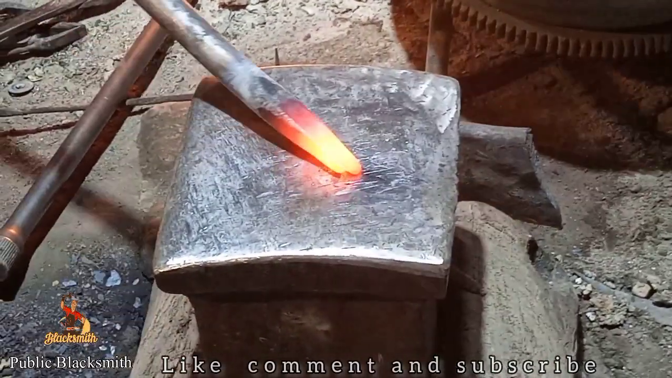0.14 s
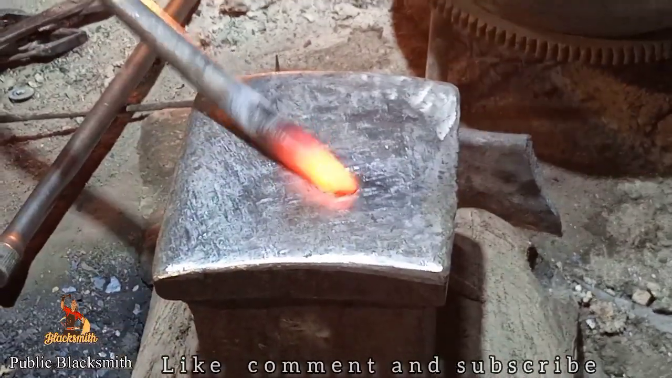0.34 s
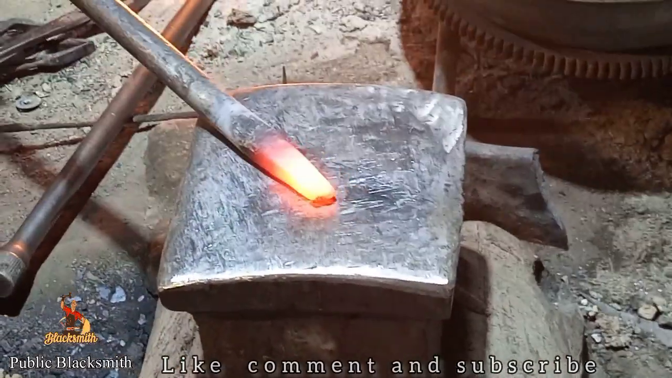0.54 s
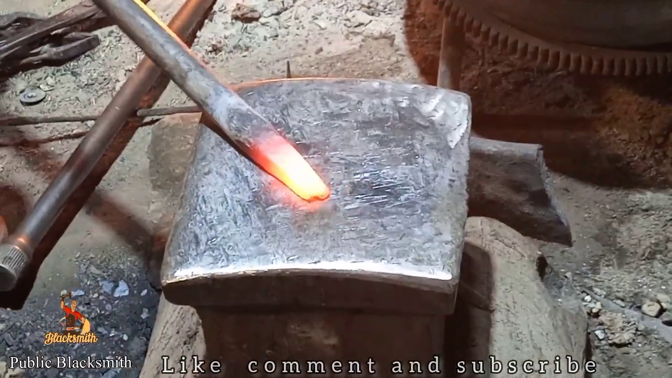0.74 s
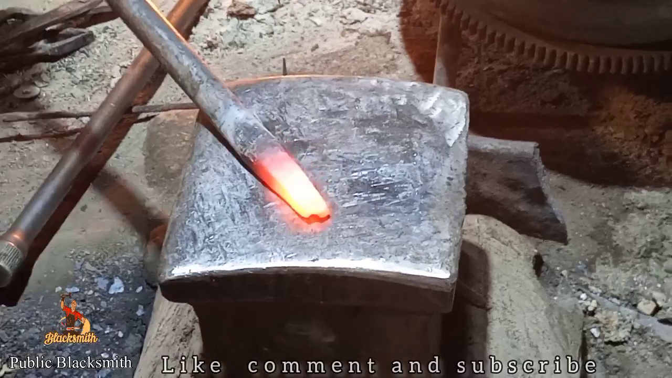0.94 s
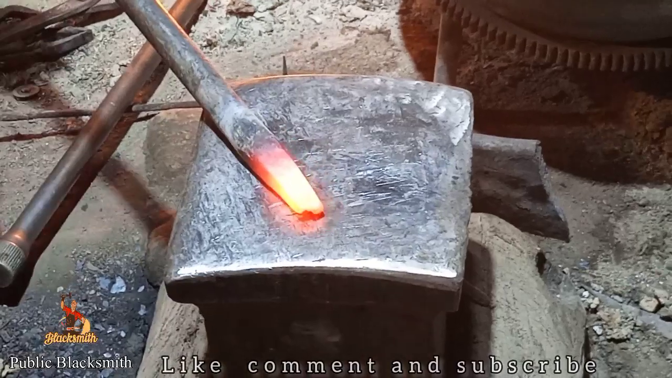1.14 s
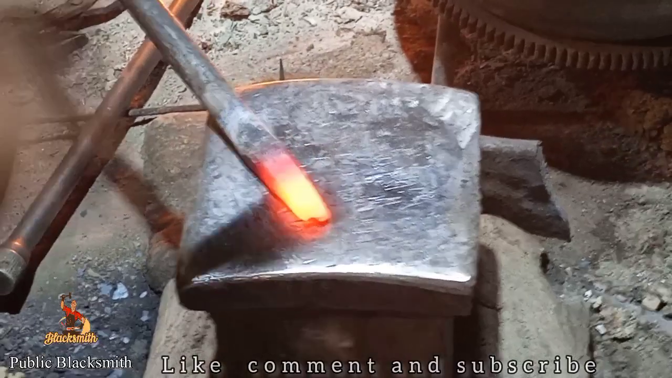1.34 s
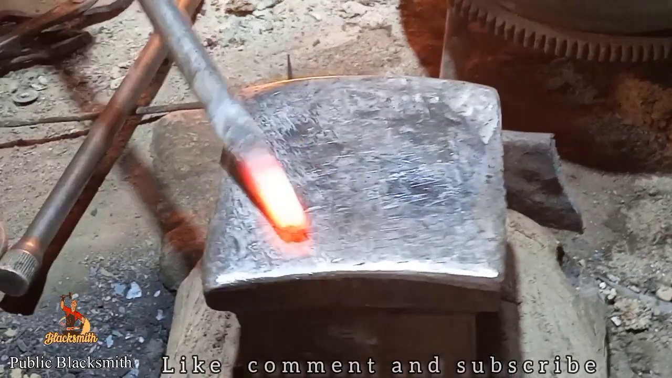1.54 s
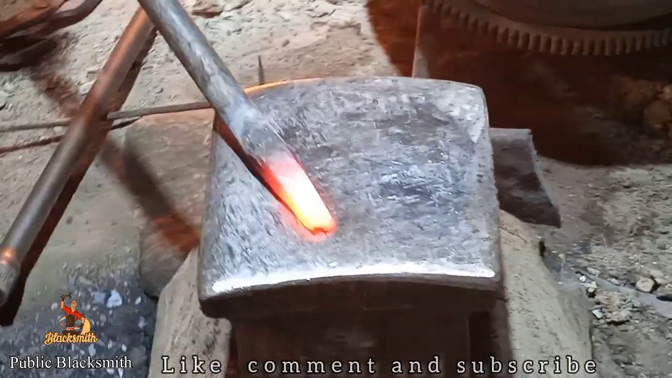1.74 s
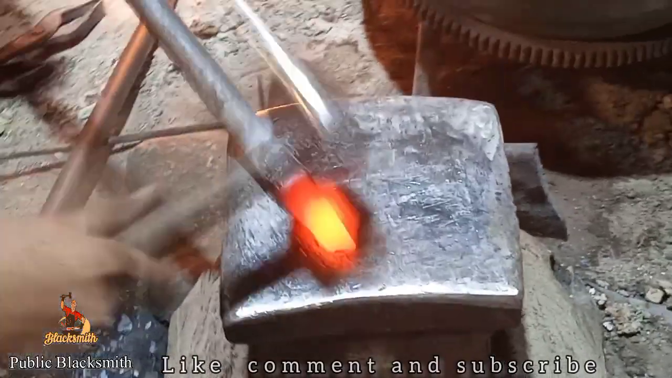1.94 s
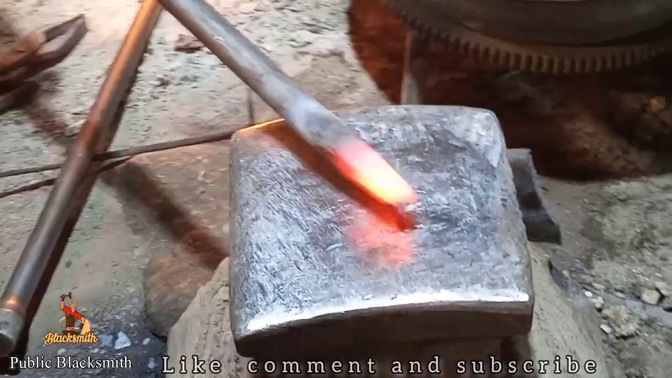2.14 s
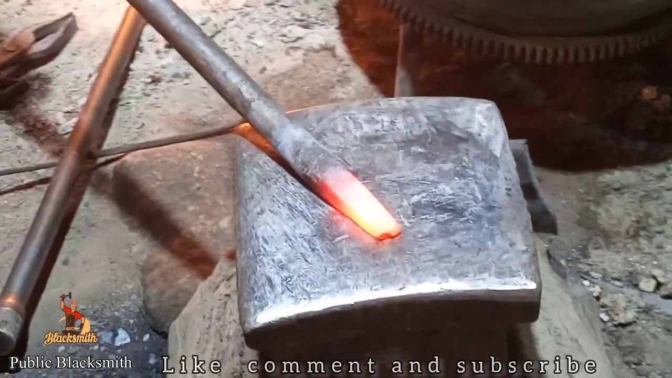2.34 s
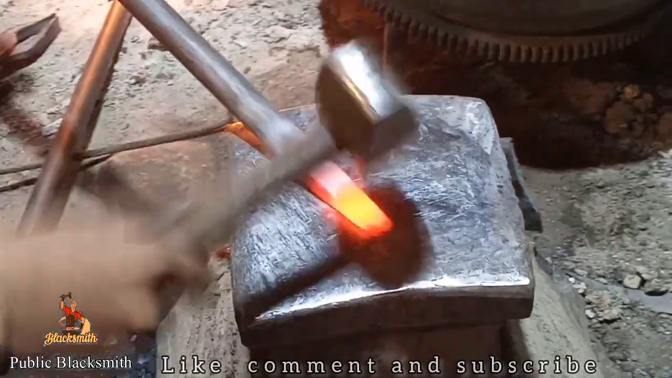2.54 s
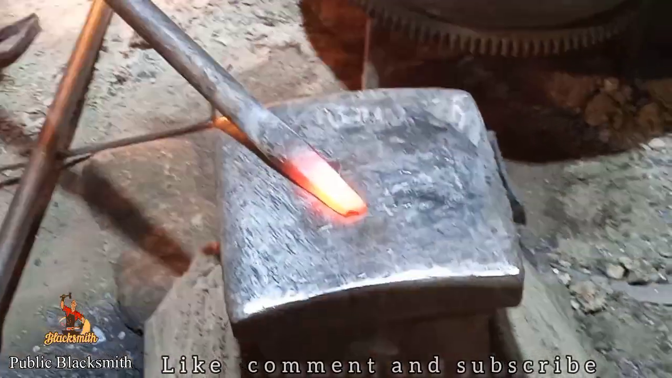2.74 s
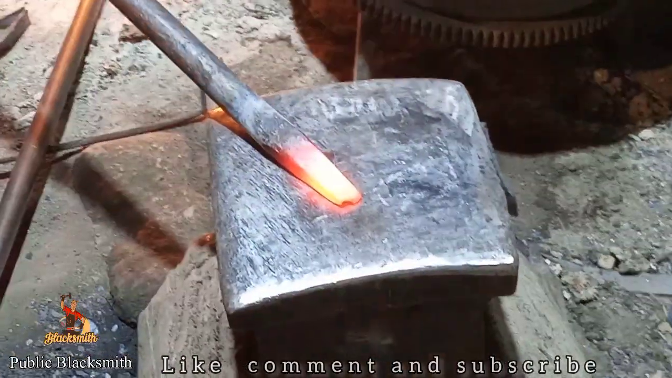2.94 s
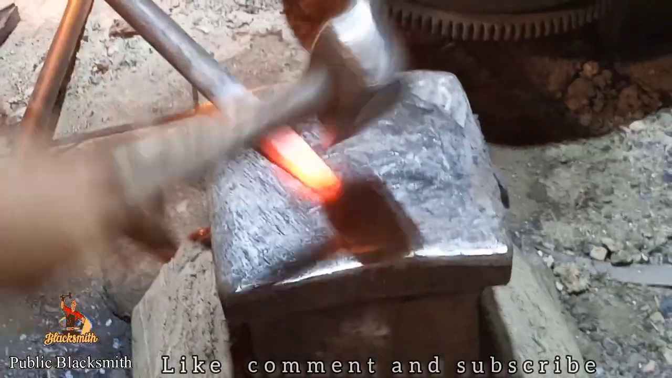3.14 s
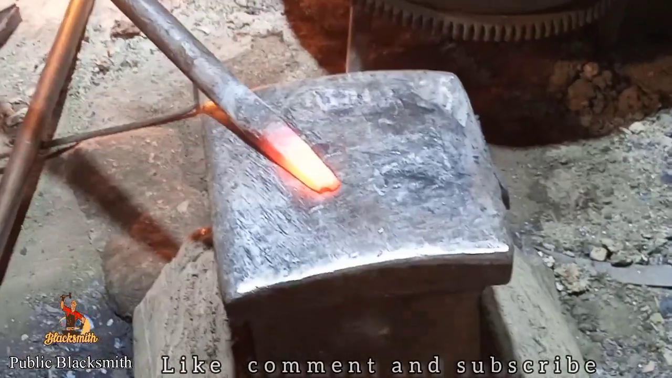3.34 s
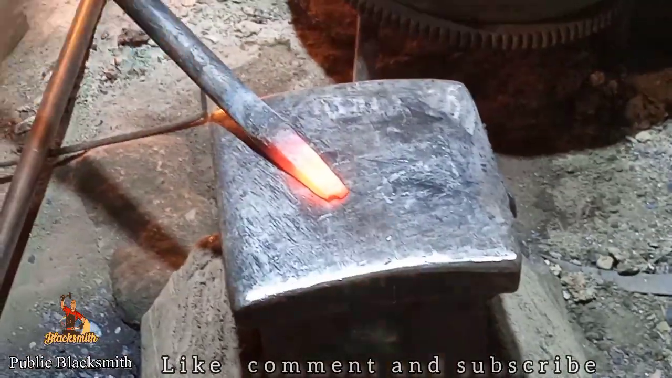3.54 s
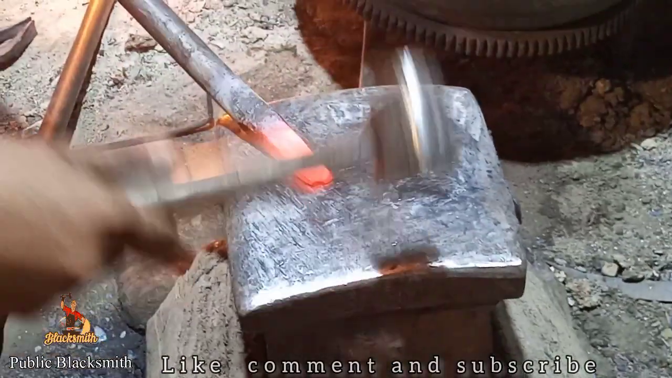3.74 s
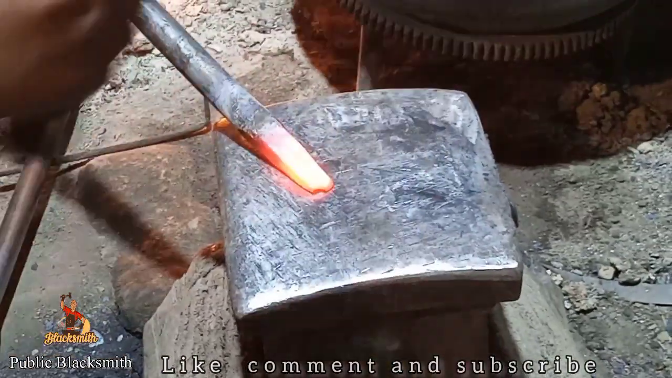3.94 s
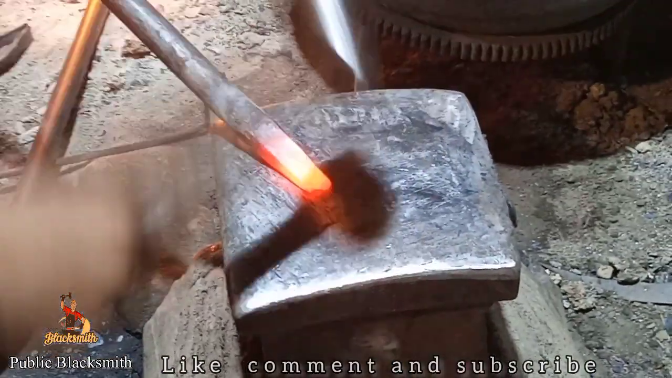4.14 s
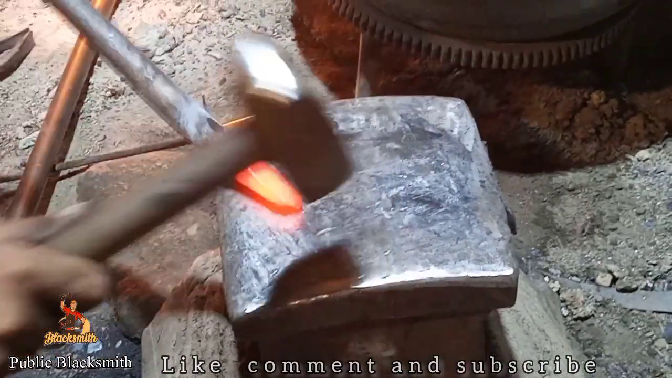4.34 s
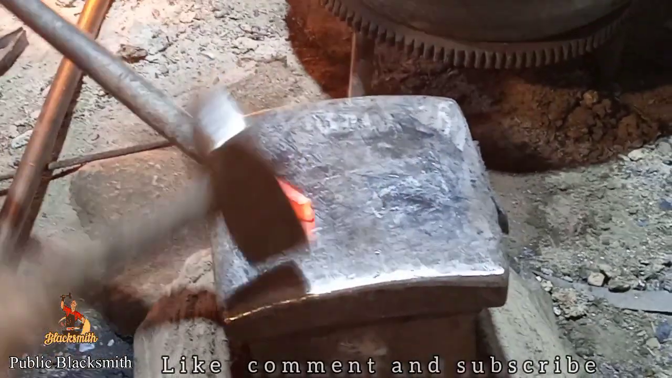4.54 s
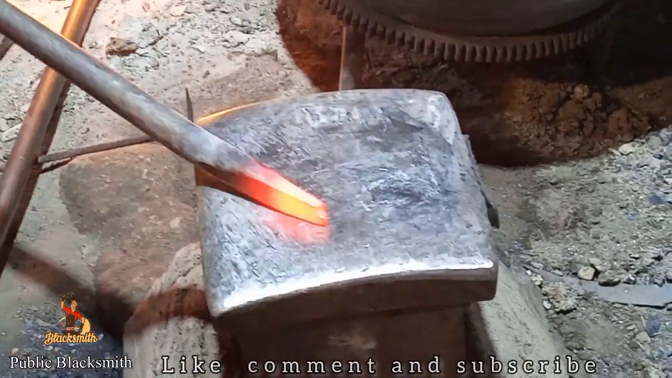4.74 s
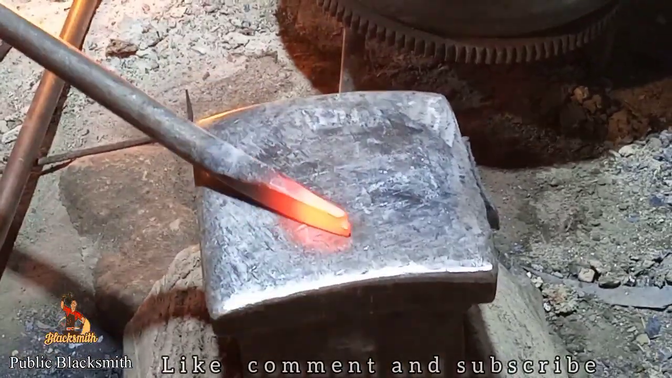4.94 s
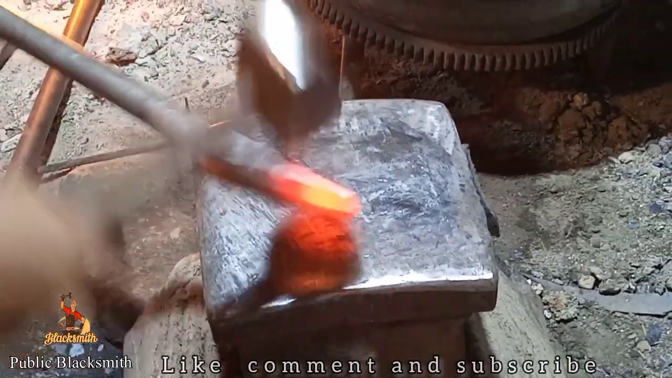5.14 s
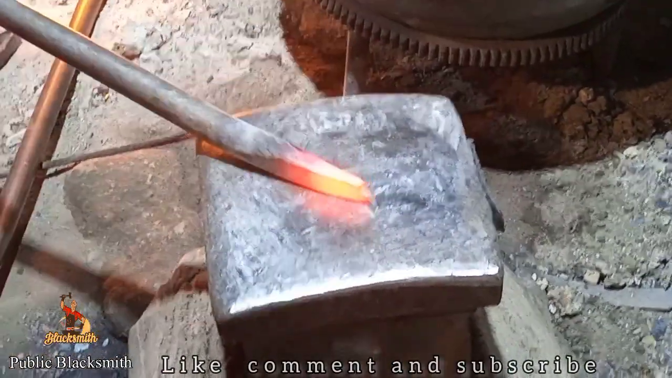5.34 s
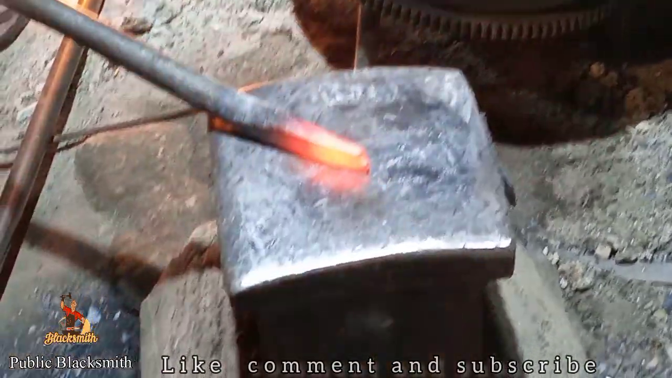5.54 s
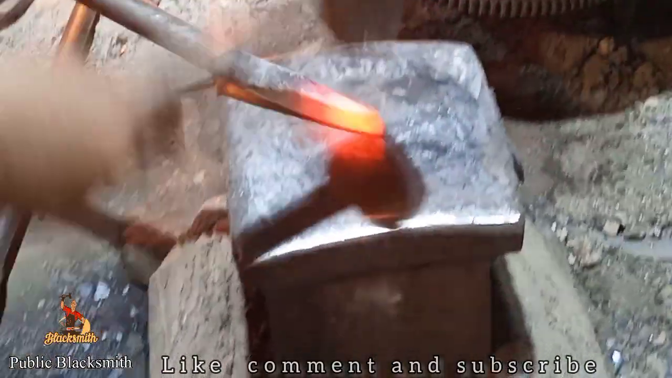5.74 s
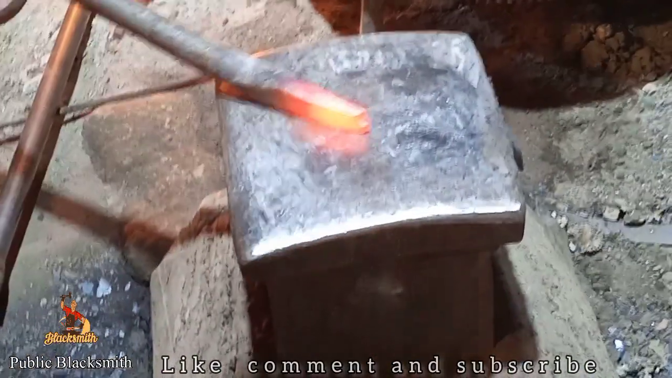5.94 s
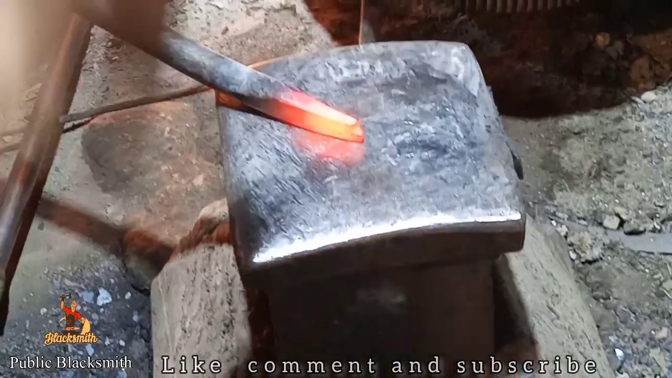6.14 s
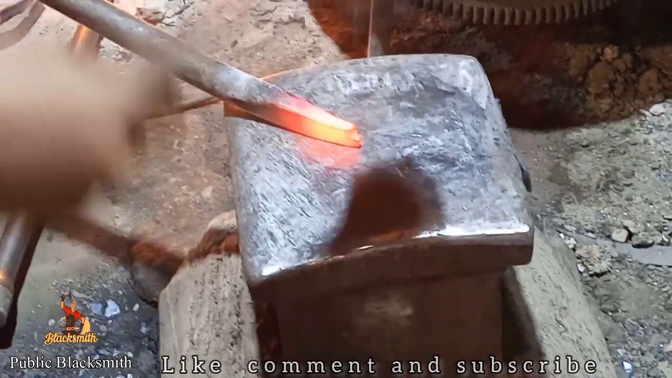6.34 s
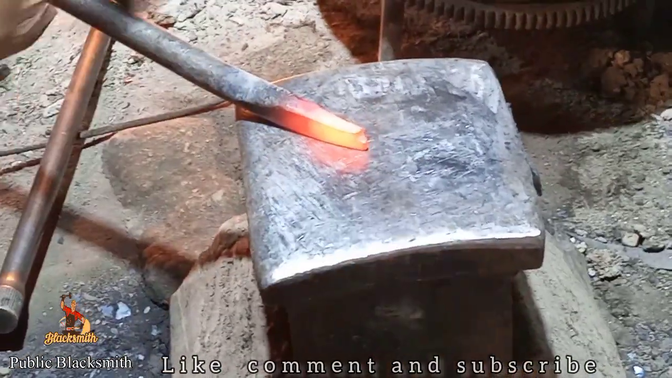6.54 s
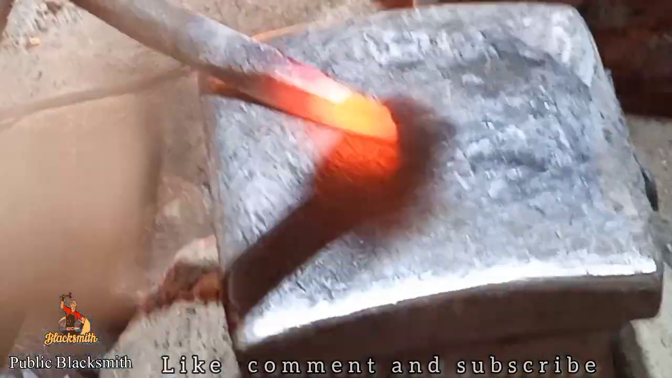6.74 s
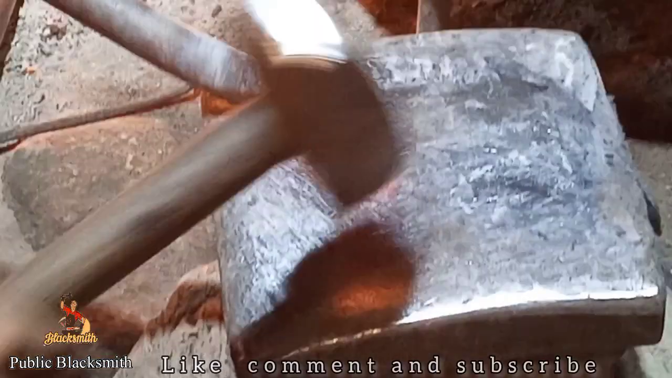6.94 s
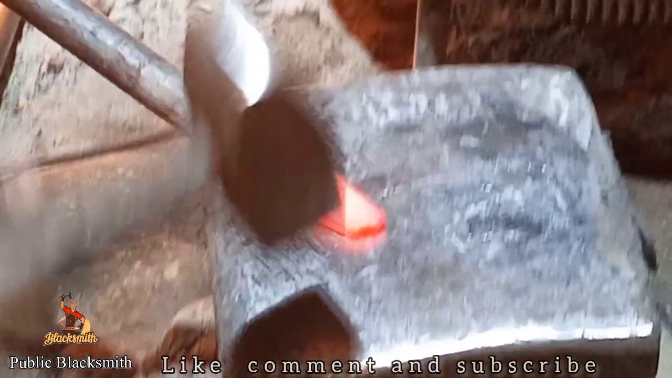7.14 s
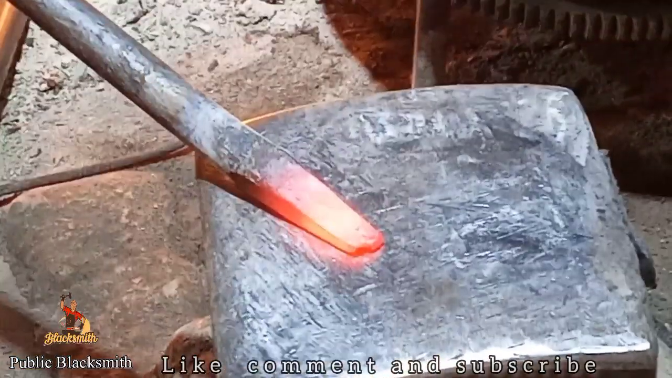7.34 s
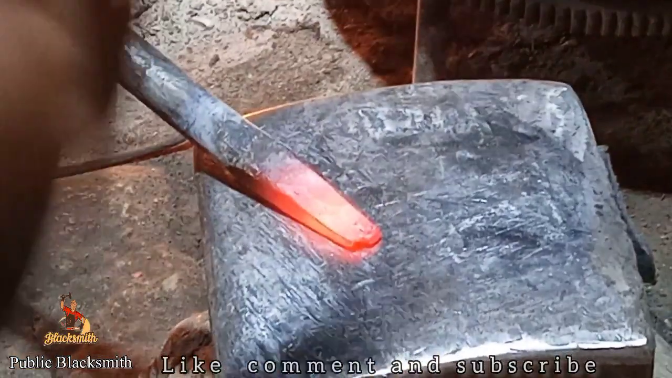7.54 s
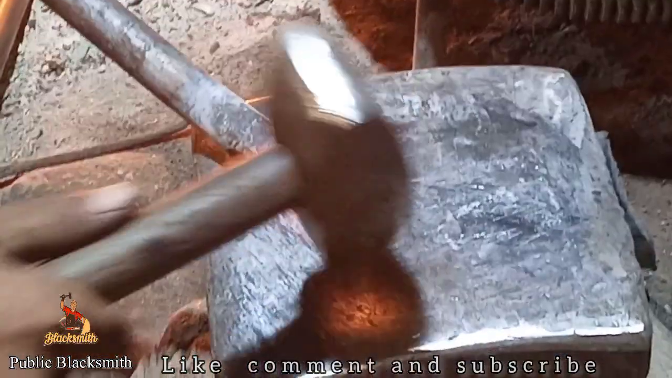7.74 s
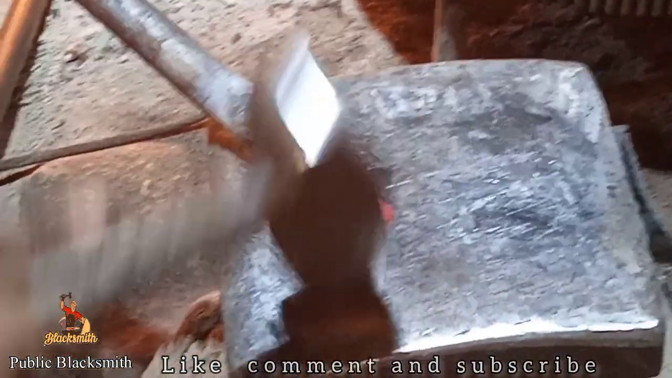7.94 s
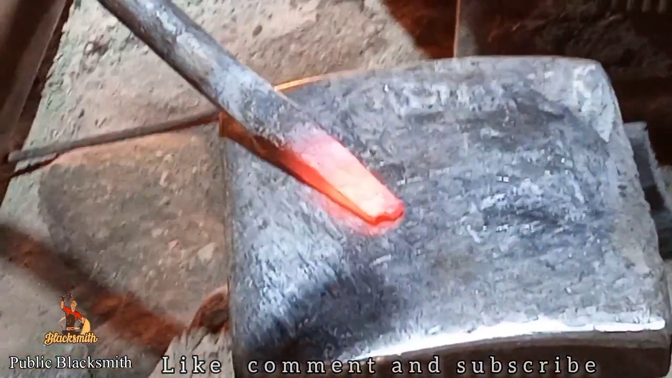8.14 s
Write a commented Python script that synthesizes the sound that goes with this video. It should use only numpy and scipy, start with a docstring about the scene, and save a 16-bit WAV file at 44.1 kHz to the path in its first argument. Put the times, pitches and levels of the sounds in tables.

```python
"""Hammer and anvil in an open forge

A hand hammer works a hot steel bar. Each blow is a burst of noise plus dying tones of bar, anvil
and hammer head; the bar hops and lands again with smaller knocks. Some taps hit the bare anvil.
The shed answers with fading noise echoes. Behind it a blower hisses and hums, made of shaped noise.
Soft low tones thud, some somewhere off, two as the deep thump of the first blow and its landing.
A phone's limiter squeezes every blow into a plateau."""
import sys
import numpy as np
from scipy import signal
from scipy.fft import rfft, irfft
from scipy.io import wavfile

SR = 44100
rng = np.random.default_rng(int(sys.argv[2]) if len(sys.argv) > 2 else 0)


def persist_wave(psi):
    """Save psi, clipped to +-1, as 16-bit WAV."""
    counts = np.round(np.clip(psi, -1, 1) * 32767).astype(np.int16)
    wavfile.write(sys.argv[1], SR, np.atleast_2d(counts).T)


def linear_from_db(decibels):
    """Turn decibels (scalar or array-like) into linear amplitude factors; 0 gives 1."""
    return 10 ** (np.asarray(decibels, float) / 20)


N = 361179      # length in samples

# Levels are those ahead of the limiter. Ring times are for a fall of 60 dB, before each strike's share.
# Hammer blows. Each row: start in seconds, crack level in dB, ring level of the bar flatwise in dB,
# and edgewise in dB, ring level of the hammer in dB, seconds until the bar rests.
BLOWS = [(1.4505, -0.5, -4, -33, -26, 0.81), (2.0228, 0.5, -3, -28, -49, 0.29),
         (2.596, -8, -13, -26, -39.5, 0.13), (3.161, -4, -16, -8, -38, 0.21),
         (3.729, -11, -33, -37, -36.5, 0.083), (4.2562, -2.5, -22, -1.5, -63, 0.3),
         (5.1947, 3.5, -11, 10.5, -21.5, .24), (5.754, -8, -17, -7.5, -34.5, 0.35),
         (6.322, -12, -12, -11.5, -30.5, 0.1), (6.8762, -3, -14.5, 0, -50, 0.3),
         (7.7235, -13.5, -12, -8, -35, 0.088)]
# The bar lands on the anvil. Each row: start in seconds, knock level in dB, ring level in dB,
# strongest pitch in Hz, fall away from that pitch in dB per octave.
LANDINGS = [(.490, -73, -45, 1900, 13), (.516, -65, -32.5, 3000, 44), (1.466, 1.5, -24, 2100, -9),
            (1.588, -18.5, -21, 2050, 14), (1.671, -26, -24.5, 1650, 10.5), (1.756, -53, -46.5, 2470, 0),
            (2.037, -7, 1.5, 2100, 0), (2.177, -10, -14, 1430, 10), (2.299, -25.5, -31, 4670, 1),
            (2.366, -40, -35, 4270, 13), (2.426, -39.5, -40.5, 2150, 5), (2.954, -71, -45.5, 1500, 46),
            (3.774, -21, -26, 2100, 8), (4.381, -17.5, -17.5, 2760, 5.5), (4.435, -31, -26.5, 2130, 1.5),
            (4.489, -27, -24, 3520, 10), (4.562, -37, -28, 2820, 15), (5.225, -11, 7.5, 2970, 20),
            (5.882, -26, -28, 3920, 5.5), (6.904, -44, -6, 2900, 14.5), (7.225, -54, -35, 2320, 10.5),
            (7.265, -61, -36.5, 4000, 11.5)]
# Bending tones of the bar lying flat: pitches in Hz; then each row: level in dB, ring time in seconds.
BAR_HZ = [877, 1425, 2064, 2810, 3600, 4483, 5490, 6570, 7770, 9000, 10370, 11710]
BAR_LEVELS = [(-7.5, 0.5), (-5, 0.51), (14, 0.11), (-1, 0.32), (-2.5, 0.32), (-5, 0.21), (-7, 0.31),
              (-7, 0.2), (-25.5, 0.44), (-29, 0.21), (-30, 0.4), (-54, 0.27)]
# Bending tones across its other side: pitches in Hz; then each row: level in dB, ring time in seconds.
EDGE_HZ = [1437, 2124, 2895, 3762, 4768, 5803, 6977, 8177, 9475]
EDGE_LEVELS = [(-4.5, 0.14), (-1, 0.4), (-1, 0.36), (-14, 0.53), (-16, 0.43), (-26, 0.46), (-23, 0.21),
               (-40, 0.4), (-37, 0.23)]
# Tones of the anvil: pitches in Hz; then each row: level in dB, ring time in seconds.
ANVIL_HZ = [1937, 3205, 3917, 5873, 6368, 9245, 10650]
ANVIL_LEVELS = [(7, .25), (-7.5, 0.53), (-13.5, 0.36), (-4, 0.3), (-33, 0.15), (-22.5, 0.34), (-32, 0.091)]
# Tones of the hammer head: pitches in Hz; then each row: level in dB, ring time in seconds.
HAMMER_HZ = [11236, 13150, 14600]
HAMMER_LEVELS = [(-10, 1), (-22, 0.5), (0, .1)]
# Crowded upper tones of the steel. Each row: pitch in Hz, level in dB, ring time in seconds.
UPPER = [(6900, 13, .19), (6800, -11, 0.27), (7050, 6, .2), (8210, -10, .3), (8700, -5, 0.14),
         (9130, -14, .3), (9520, -12, .3), (10600, -7, 0.27), (10660, -23, .2), (12050, -16, .15),
         (13900, -12, .12), (14290, -21, .2), (15380, -15, .15)]
# Short tones of the contact and the stump under the anvil.
# Each row: pitch in Hz, level in dB, ring time in seconds.
STUMP = [(219, -8, 0.079), (325.4, -15.5, 0.18), (470, -3, 0.02), (558, 8.5, 0.025), (977, -0.5, 0.06),
         (1792, 20, 0.01)]


def body(hz, levels):
    """Join pitches and levels into rows of pitch, level and ring time."""
    return np.column_stack([hz, levels])


FLAT, EDGE = body(BAR_HZ, BAR_LEVELS), body(EDGE_HZ, EDGE_LEVELS)
ANVIL, HEAD = body(ANVIL_HZ, ANVIL_LEVELS), body(HAMMER_HZ, HAMMER_LEVELS)


def rms_one(x):
    """Scale to an rms of 1."""
    return x / np.sqrt(np.mean(x ** 2) + 1e-20)


def at_hz(points, hz):
    """Read a table of pitch and value between its points, along log frequency."""
    table_hz, values = np.array(points).T
    return np.interp(np.log(hz + 1), np.log(table_hz), values)


def drift(rate_hz):
    """Slow random wander with an rms of 1, made at every 40th sample and joined by lines."""
    r = np.exp(-80 * np.pi * rate_hz / SR)
    white = rng.standard_normal(N // 40 + 2002)
    slow = signal.lfilter([1], [1, -2 * r, r * r], white)[2000:]      # without the filter's start
    return np.interp(np.arange(N) / 40, np.arange(len(slow)), rms_one(slow))


def bands(length):
    """Third-octave bands of noise, each with its centre in Hz."""
    edges = 25 * 2 ** np.arange(0, 9.6, 1 / 3)
    white = rng.standard_normal((2, length))      # neighbours take turns with two noises
    for k, (low, high) in enumerate(zip(edges, edges[1:])):
        sos = signal.butter(2, [low, high], "band", fs=SR, output="sos")
        yield np.sqrt(low * high), signal.sosfilt(sos, white[k % 2])


def add(out, s, sound):
    """Lay a sound in at time s."""
    at = round(s * SR)
    out[at:at + len(sound)] += sound[:N - at]


def whistle(hz, width_hz, db):
    """Noise through one narrow resonance gives a wavering tone; its strength drifts too."""
    r = np.exp(-np.pi * width_hz / SR)
    poles = [1, -2 * r * np.cos(2 * np.pi * hz / SR), r * r]
    tone = signal.lfilter([1, 0, -1], poles, rng.standard_normal(N))
    return linear_from_db(db + 2.6 * drift(6.4)) * rms_one(tone)


def blower():
    """Moving air gives broad hiss with flickering bands; a faint motor hum and whistles join it."""
    # Colour of the hiss. Each row: pitch in Hz, relative level in dB.
    hiss_colour = [(24, -72.5), (40, -18), (146, -4.5), (248, -5), (313, 1), (496, -16.5), (557, -5.5),
                   (864, -13), (1770, -2), (1980, -10.5), (2390, -5.5), (3220, -17.5), (3700, -16.5),
                   (7000, -35), (10000, -90), (22000, -120)]
    # Hum of the motor. Each row: pitch in Hz, width in Hz, level in dB before the waver.
    hum_tones = [(83, 22, -67), (158, 3.9, -67), (240, 6.5, -83.5), (320, 2.7, -80), (387.5, 7.2, -73.5),
                 (483, 4.2, -79.5), (558, 2.1, -73), (603, 3.6, -80.5)]
    # The hum wavers. Each row: time in seconds, gain in dB.
    hum_waver = [(0, 1), (1.4, 3.5), (2.001, -8), (2.7, -9.5), (3.5, 0), (4.5, -2.5), (5.2, -4), (6.0, 3.5),
                 (7.0, 3.5), (8.19, 1.5)]
    # Whistling resonances of the air stream. Each row: pitch in Hz, width in Hz, middle level in dB.
    air_tones = [(1696, 44, -63.5), (1800, 7.3, -67.5), (2293, 120, -74)]
    together = 0.5 * drift(0.78)      # dB, shared by all bands
    hiss = sum(band * linear_from_db(at_hz(hiss_colour, hz) + together + 3.17 * drift(8.2)) for hz, band in bands(N))
    hiss = signal.sosfilt(signal.butter(6, 7300, fs=SR, output="sos"), hiss)
    waver = linear_from_db(np.interp(np.arange(N) / SR, *np.transpose(hum_waver)))
    hum = waver * sum(whistle(*row) for row in hum_tones)
    return linear_from_db(-56) * rms_one(hiss) + hum + sum(whistle(*row) for row in air_tones)


def ring(modes, level_db, share=0.65, peak_hz=2500, fall_db=0.0, spread_db=1.5, beat=0.93,
         rise_s=0.00058, stop_s=0.38, rest_s=0.31):
    """Struck steel: dying sines of random strength that beat; stop_s chokes the high, rest_s stills all."""
    hz, db, t60 = np.transpose(modes)[:, :, None]
    t = np.arange(round(min(rest_s + .15, .6) * SR), dtype="float32") / SR
    draw, twin = rng.standard_normal(hz.shape), rng.random((4, *hz.shape))

    def turns(f, start):
        return (2 * np.pi * (f * t + start)).astype("float32")

    octaves_away = np.abs(np.log2(hz / peak_hz))
    strength = linear_from_db(level_db + db - fall_db * octaves_away + spread_db * draw)
    decay = np.log(1000) * t / (t60 * share)
    decay = decay + 35 * np.maximum(t - rest_s, 0)
    decay = decay + 49.0 * np.minimum(hz / 3000, 2) ** 9.3 * np.maximum(t - stop_s, 0)
    slow = turns(6 + 14 * twin[0], twin[1])
    fast = turns(25 + 50 * twin[2], twin[3])
    depth = beat * np.minimum(hz / 2400, 1) ** 2      # lower tones beat less
    throb = 1 + depth * np.cos(slow) + 2 * depth * np.cos(fast)
    tones = np.exp(-decay.astype("float32")) * throb * np.sin(turns(hz, 0))
    return (strength * tones).sum(0) * (1 - np.exp(-t / rise_s)) ** 2


def crack(level_db, length_s, clang_db, clang_s, treble_db=0.0):
    """A short noise burst, then a rough clang as steel chatters in its crowded tones, high ones dying first."""
    # Colour of the crack. Each row: pitch in Hz, relative level in dB.
    crack_colour = [(30, -53.5), (88, -8), (150, -21.5), (205, -6.5), (475, -14), (905, -6.5), (1190, -6),
                    (1390, 3), (2810, -1), (4580, -8), (5150, -12), (6510, -12.5), (7320, -22.5),
                    (13000, -37.5), (14800, -37), (16000, -37)]
    # Centres of the clang's bands in Hz.
    clang_hz = [2500, 5000, 8500, 14000]
    t, hz = np.arange(8192) / SR, np.fft.rfftfreq(8192, 1 / SR)
    white, centres = rng.standard_normal(len(t)), np.array(clang_hz)[:, None]
    split = np.array([np.interp(np.log(hz + 1), np.log(clang_hz), row) for row in np.eye(len(centres))])
    dying = np.exp(-t / clang_s * (centres / centres[0]) ** 0.46)
    dying = dying * np.cos(np.pi / 2 * t / t[-1])      # reaches zero at the end
    clang = (irfft(rfft(white) * split) * dying).sum(0)
    burst = white * np.exp(-t / length_s) + linear_from_db(clang_db) * clang
    burst = burst * (1 - np.exp(-t / 0.0016))

    # Peaks of random height at the steel's own pitches
    modes = np.array(BAR_HZ + EDGE_HZ + ANVIL_HZ + HAMMER_HZ + [row[0] for row in UPPER])[:, None]
    widths = 0.0046 * modes + 12
    peaks = (rng.random(modes.shape) ** 2 / (1 + ((hz - modes) / widths) ** 2)).sum(0)
    contrast = 12.3 * (1 + hz / 4000) ** 1.14
    colour = linear_from_db(at_hz(crack_colour, hz) + treble_db * np.log2(1 + hz / 3000))
    colour = colour * np.sqrt((1 + contrast * peaks) / (1 + 0.1 * contrast))
    fold = irfft(np.log(colour)) * np.r_[1, np.full(4095, 2), 1, np.zeros(4095)]
    shape = np.exp(rfft(fold))      # minimum phase: nothing sounds early
    return linear_from_db(level_db) * irfft(rfft(burst) * shape) / np.sqrt(np.sum(irfft(shape) ** 2))


def earlier_hammer_ring(rings):
    """The hammer head still sings from an earlier blow, in its lowest listed tone."""
    add(rings, 0, ring(HEAD[:1], -60, 0.49, beat=0.21))


def until_next_touch(s):
    """Seconds until the bar next meets steel; landings of -33 dB or softer do not choke its ring."""
    touches = np.sort([row[0] for row in BLOWS + LANDINGS if row[1] > -33] + [N / SR + 1])
    return touches[touches > s + .001][0] - s


def landings(impacts, rings):
    """The bar drops on the anvil tip first, then along its length; it knocks and both bodies ring."""
    for s, knock_db, ring_db, peak_hz, fall_db in LANDINGS:
        # The bar is turned a quarter round between 5 and 7 s
        side, other = (EDGE, FLAT) if 5 < s < 7 else (FLAT, EDGE)
        treble_db = 5 + 0.071 * knock_db      # per octave; softer landings are duller
        share = 0.35 - 0.0078 * knock_db      # softer landings ring longer
        add(impacts, s, crack(knock_db, 0.0011, 0.5, 0.013, treble_db))
        second_s = s + 0.015 * rng.uniform(0.51, 1.2)
        add(impacts, second_s, crack(knock_db - 3.5, 0.0013, 0.65, 0.0069, treble_db + 6.5))
        add(rings, s, ring(UPPER, knock_db - 33.5, 0.38, beat=0.58, rest_s=.12))
        add(rings, s, ring(side, ring_db, share, peak_hz, fall_db, beat=0.62, rise_s=0.0044,
                           stop_s=until_next_touch(s)))
        add(rings, s, ring(ANVIL, ring_db - 8.5, 0.52, peak_hz, fall_db, beat=0.25, rise_s=0.003,
                           rest_s=0.17))
        add(rings, s, ring(other, ring_db - 9, share, peak_hz, fall_db, beat=0.93, rise_s=0.0066,
                           rest_s=0.3))


def low_thuds():
    """Each thud is a low tone under a bell-shaped swell; fainter ones come at random."""
    # Soft low thuds: some somewhere off, two the deep thump of the first blow and its landing.
    # Each row: middle in seconds, peak level in dB, pitch in Hz.
    clear_thuds = [(.75, -47.5, 339), (1.057, -50.5, 159), (1.481, -30, 196.6), (1.599, -35.5, 300),
                   (3.039, -55, 130.3), (3.538, -48.5, 126), (3.944, -51.5, 160), (4.653, -39.5, 158),
                   (4.801, -48, 320), (4.848, -47.5, 156), (5.113, -49.5, 147), (6.454, -50.5, 126),
                   (6.73, -51.5, 158)]
    out, t = np.zeros(N), np.arange(N) / SR
    faint = [(u * N / SR, -57 + 3 * (2 * v - 1), 115 + 45 * w) for u, v, w in rng.random((10, 3))]
    for s, db, hz in clear_thuds + faint:
        near = slice(max(round((s - .2) * SR), 0), round((s + .2) * SR))
        swell = np.exp(-((t[near] - s) * hz / 4.8) ** 2)      # half length of 4.8 cycles
        out[near] += linear_from_db(db) * swell * np.sin(2 * np.pi * hz * t[near])
    return out


def blows(impacts, rings):
    """The hammer cracks on the bar, thumps the stump and rings bar, anvil and hammer head."""
    pinned_hz, pinned_s = 2400, 0.11      # strongest bar pitch after a hop this short
    for s, crack_db, bar_db, edge_db, hammer_db, rest_s in BLOWS:
        # Longer hops ring lower and longer
        bar_hz = pinned_hz * (pinned_s / rest_s) ** 0.55
        share = 0.53 * (rest_s / pinned_s) ** 0.12
        anvil_db = -9.5 + crack_db - 5 * np.log2(rest_s / pinned_s)      # 5 dB less per doubled hop
        add(impacts, s, crack(crack_db, 0.0016, 1.22, 0.035, treble_db=6.5))
        add(impacts, s, ring(STUMP, 0.27 * crack_db, beat=0, rise_s=0.00037, rest_s=0.23))
        add(rings, s, ring(FLAT, bar_db, share, bar_hz, 7.5, beat=0.17, stop_s=until_next_touch(s),
                           rest_s=rest_s))
        add(rings, s, ring(EDGE, edge_db, share, beat=0.24, rest_s=rest_s))
        add(rings, s, ring(UPPER, crack_db - 36.5, 1.0, beat=0.26, rest_s=0.19))
        add(rings, s, ring(ANVIL, anvil_db, 0.65, beat=0.41))
        # The hammer's high ring comes up gradually behind the crack
        add(rings, s, ring(HEAD, hammer_db, 0.49, spread_db=0, beat=0.12, rise_s=0.031, stop_s=.6,
                           rest_s=.42))


def taps(impacts, rings):
    """The hammer is let fall on the bare anvil face: a shorter crack, a thump and bare steel tones."""
    # Each row: start in seconds, crack level in dB, ring level in dB, stump thump level in dB,
    # treble tilt in dB per octave.
    tap_rows = [(4.589, -4.5, -27, -14.5, -7), (7.156, -2.5, -20.5, -25, -4.5),
                (8.006, -10, -29, -16.5, -0.5)]
    # Tones woken by steel on bare steel: pitches in Hz; then each row: level in dB, ring time in seconds.
    face_hz = [711, 1179, 2218, 2560, 2681, 2719, 3268, 7607, 9254, 10650]
    face_levels = [(16, 0.063), (0.5, 0.022), (14, 0.091), (8, 0.17), (-26, 0.067), (0.5, 0.13),
                   (-18, 0.18), (-27, 0.34), (-18.5, 0.28), (-39, 0.43)]
    for s, crack_db, ring_db, thump_db, treble_db in tap_rows:
        add(impacts, s, crack(crack_db, 0.0008, -0.63, 0.0085, treble_db))
        add(impacts, s, ring(STUMP, thump_db, beat=0, rise_s=0.00033, rest_s=.1))
        add(rings, s, ring(body(face_hz, face_levels), ring_db, beat=1.0))


def shed(x):
    """Walls return a blur of echoes: noise bands that each die at their own rate."""
    # Echoes of the shed. Each row: pitch in Hz, time to fall 60 dB in seconds.
    echo_times = [(100, 0.17), (400, 0.21), (1500, 0.12), (4000, 0.2), (8000, 0.15), (16000, 0.043)]
    t = np.arange(SR // 2) / SR
    tail = sum(band * linear_from_db(-60 * t / at_hz(echo_times, hz)) for hz, band in bands(len(t)))
    tail = tail * (1 - np.exp(-t / 0.00097)) / np.sqrt(np.sum(tail ** 2))
    echoes = signal.fftconvolve(x, tail)[:N]
    return linear_from_db(-7) * signal.lfilter(*signal.butter(1, 5950, fs=SR), echoes)


def scene():
    """Steel, echoes and background; the ringing tones of bar, anvil and hammer go to the shed more quietly than
    the impacts and stump thumps."""
    impacts, rings = np.zeros((2, N))
    background = blower()
    earlier_hammer_ring(rings)
    landings(impacts, rings)
    thuds = low_thuds()
    blows(impacts, rings)
    taps(impacts, rings)
    echoes = shed(impacts + linear_from_db(-5.5) * rings)
    return (impacts + rings + echoes + background + thuds)[None]


def low_pass(x):
    """Removes everything above the highest recorded frequency."""
    return signal.sosfilt(signal.butter(12, 16830, fs=SR, output="sos"), x)


def record(dry):
    """Bass and top are cut; the limiter looks ahead by 1.6 ms and lets go at a steady rate."""
    limit_db, squeeze = -33, 0.71      # threshold; share of the excess taken away
    attack_s, ahead_s, release_db_per_s = 0.00095, 0.0016, 288
    dry = signal.sosfilt(signal.butter(3, 60, "high", fs=SR, output="sos"), dry)
    dry = signal.sosfilt(signal.cheby2(16, 35, 15750, fs=SR, output="sos"), dry)
    t = np.arange(N) / SR
    power = signal.lfilter([.02], [1, -.98], dry[0] ** 2)
    over = squeeze * np.maximum(10 * np.log10(power + 1e-12) - limit_db, 0)
    fall = release_db_per_s * t
    held = np.maximum.accumulate(over + fall) - fall
    r = np.exp(-1 / (attack_s * SR))
    smooth = signal.lfilter([1 - r], [1, -r], held)
    cut_db = np.interp(t + ahead_s, t, smooth)
    return low_pass(dry * linear_from_db(-cut_db))


dry = scene()
out = record(dry)
persist_wave(out)
```